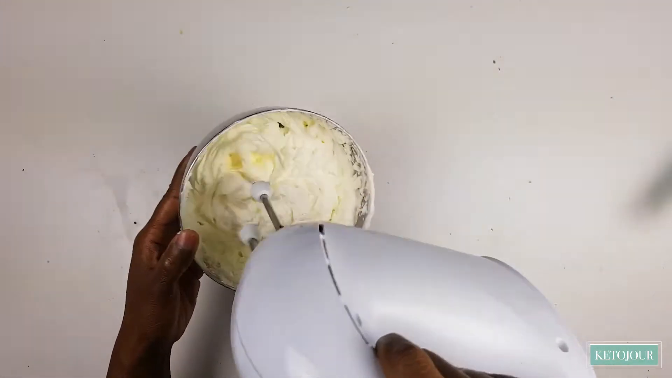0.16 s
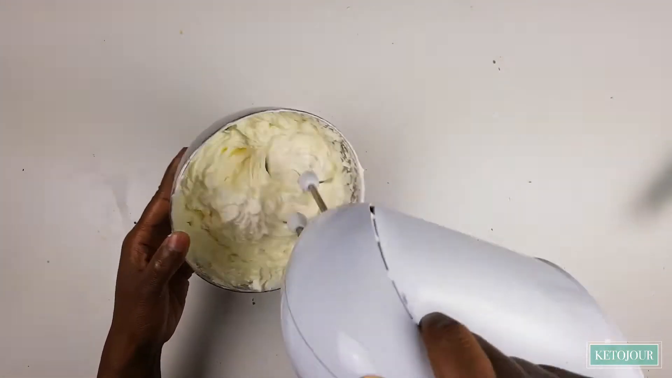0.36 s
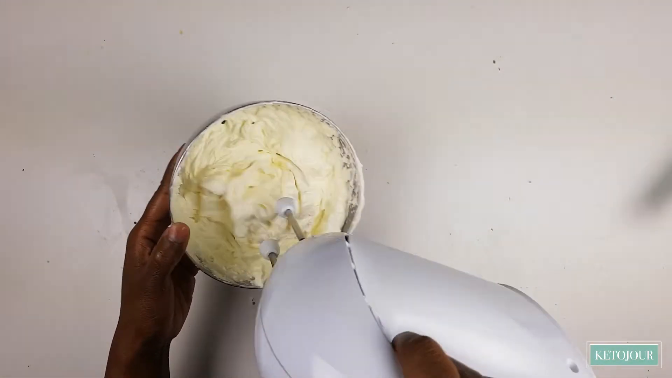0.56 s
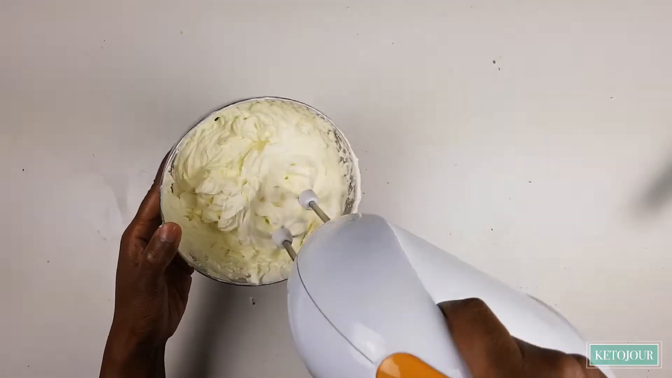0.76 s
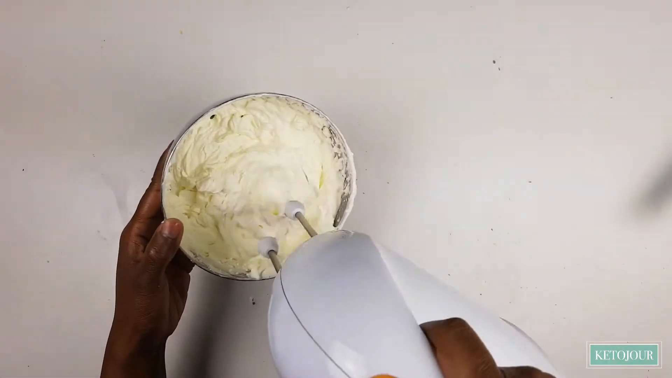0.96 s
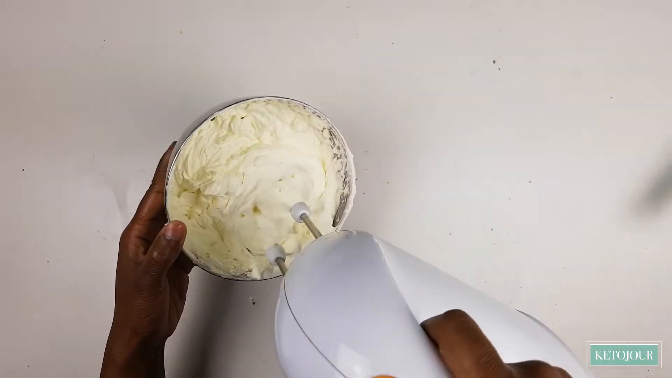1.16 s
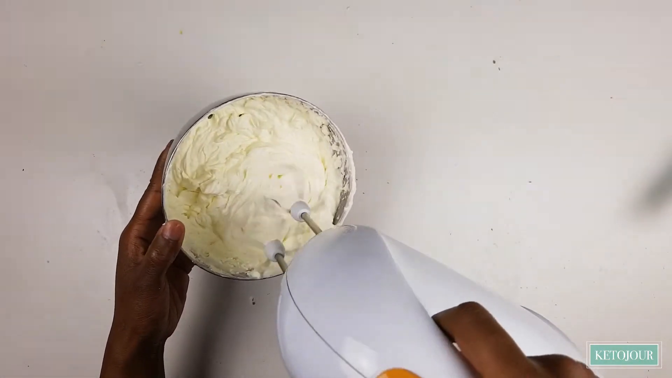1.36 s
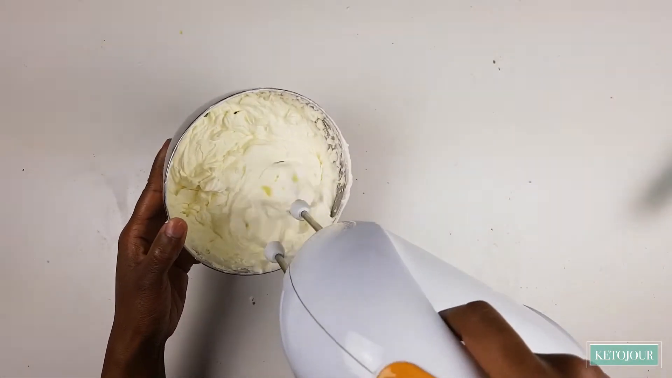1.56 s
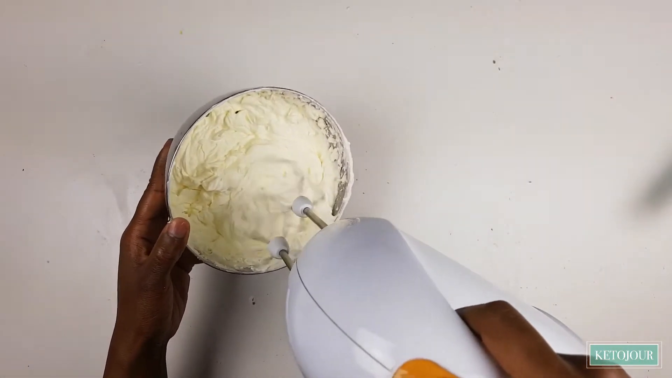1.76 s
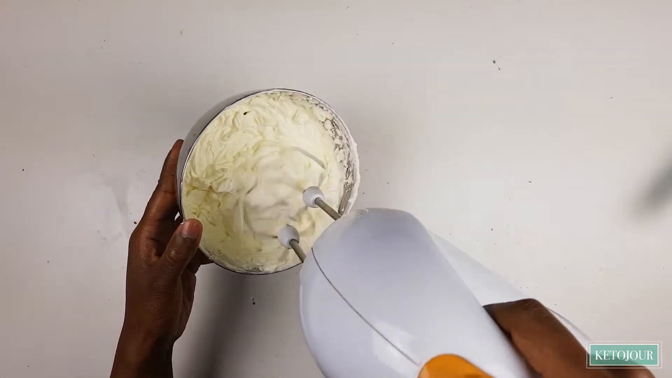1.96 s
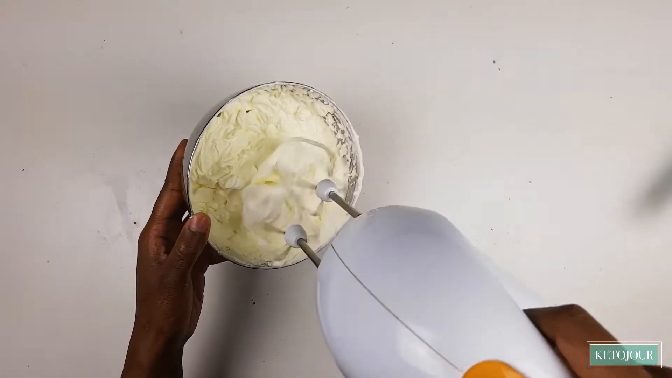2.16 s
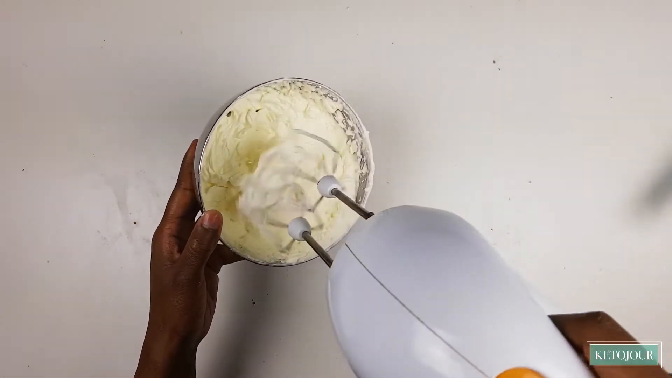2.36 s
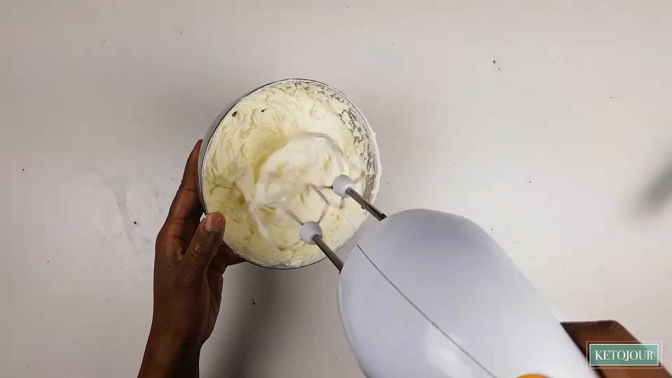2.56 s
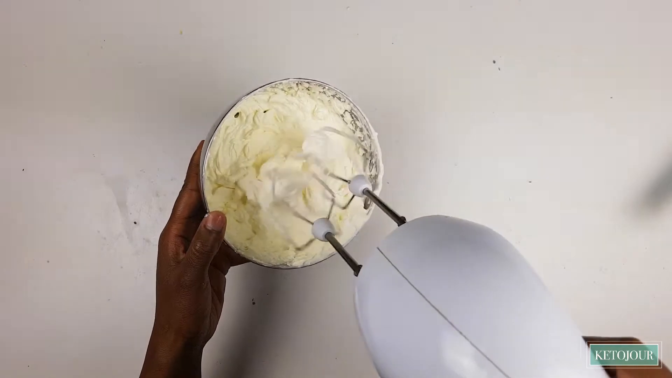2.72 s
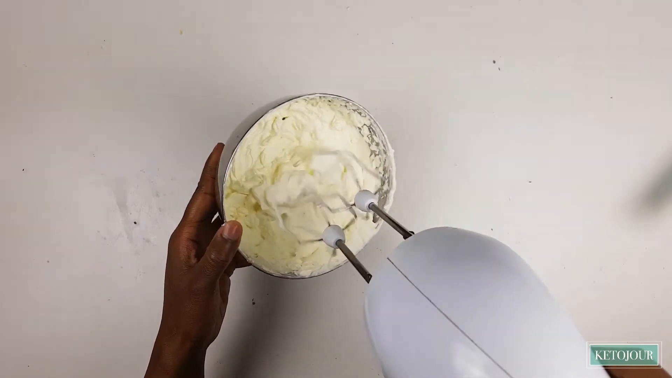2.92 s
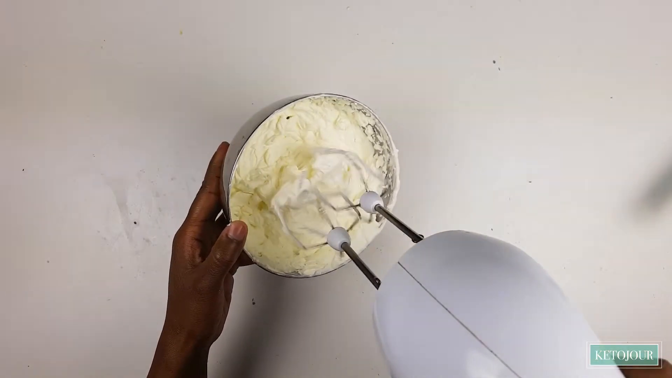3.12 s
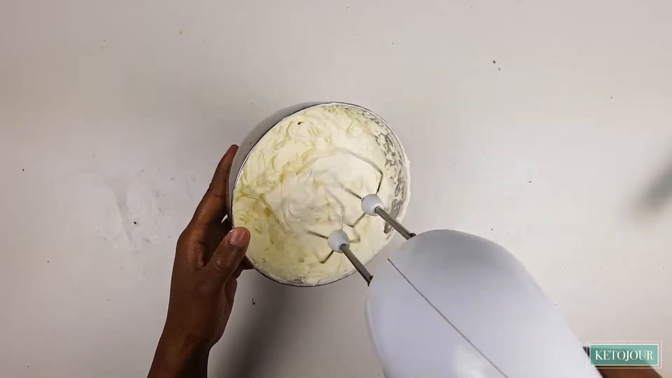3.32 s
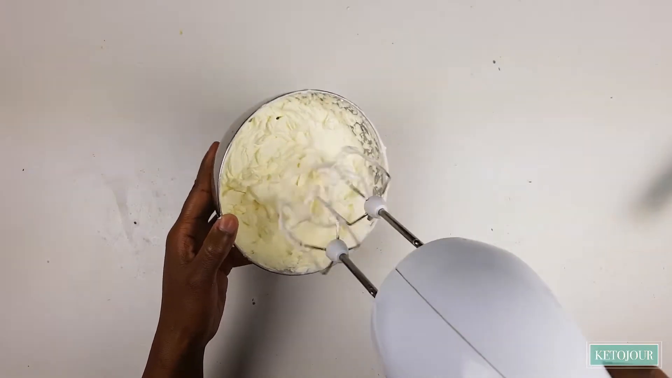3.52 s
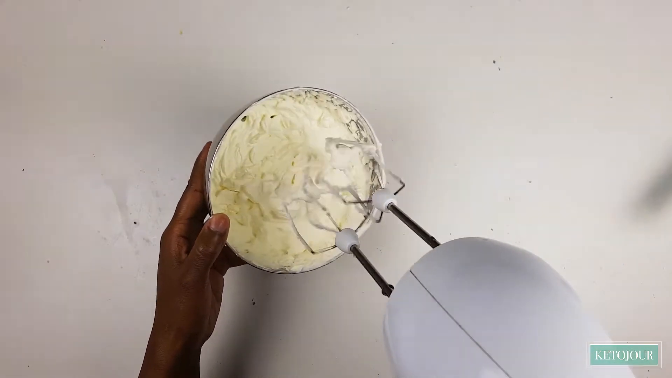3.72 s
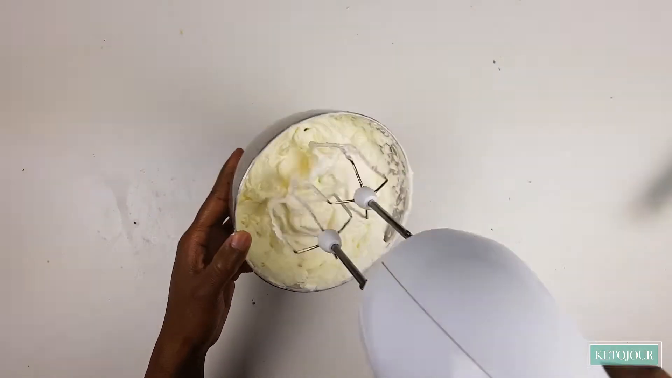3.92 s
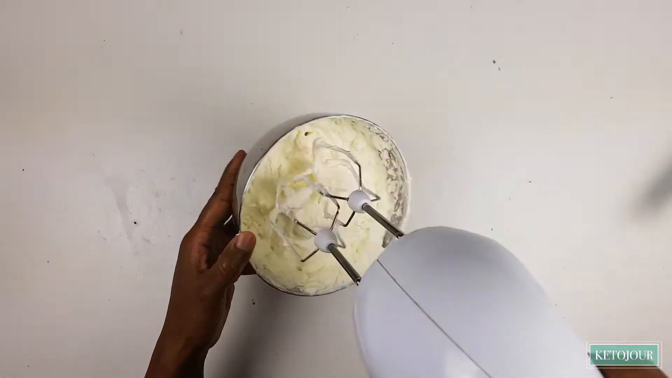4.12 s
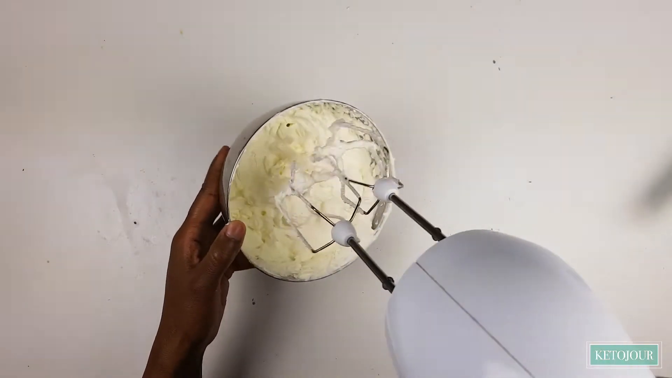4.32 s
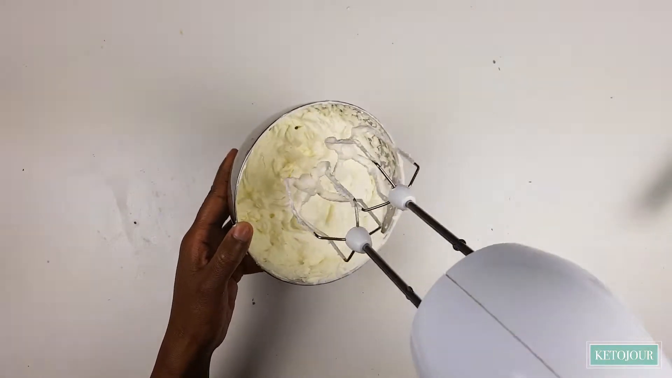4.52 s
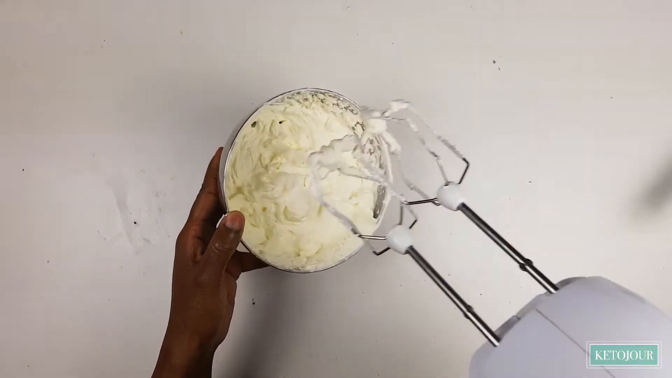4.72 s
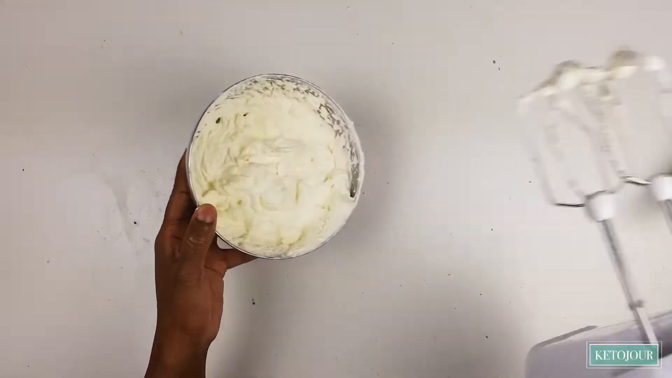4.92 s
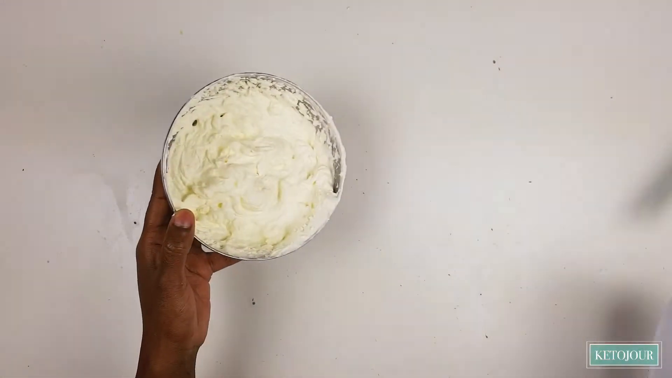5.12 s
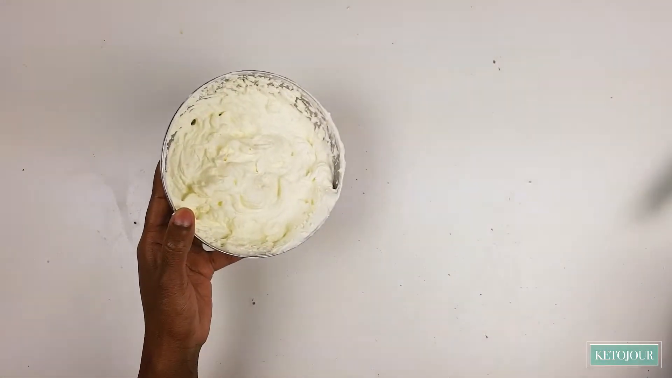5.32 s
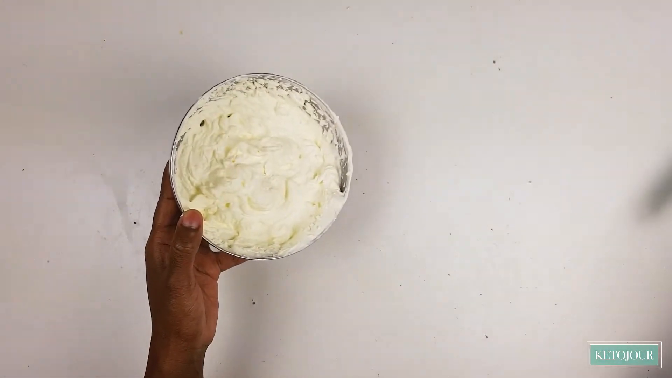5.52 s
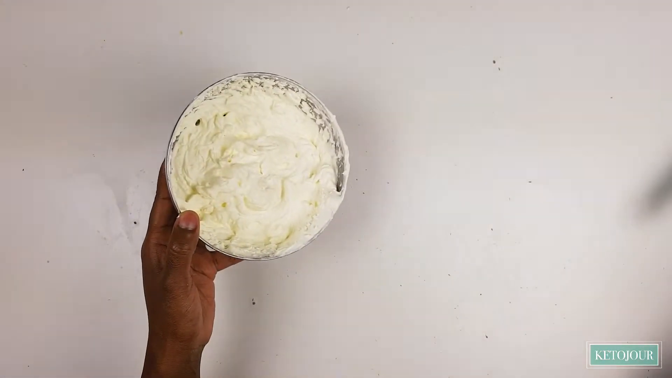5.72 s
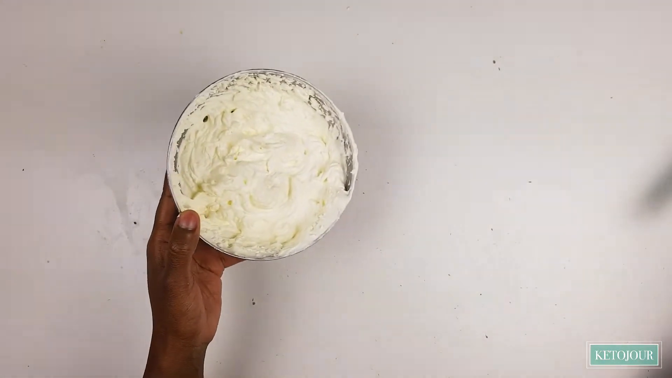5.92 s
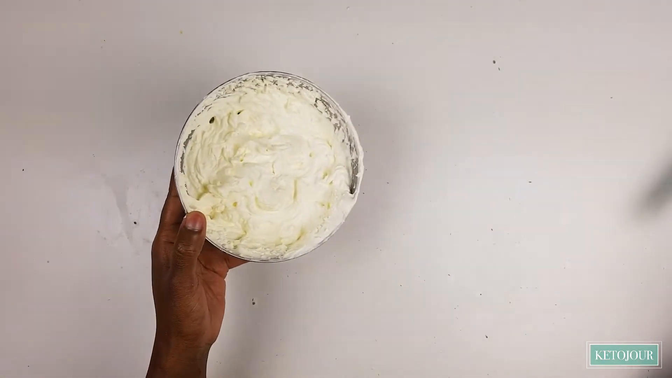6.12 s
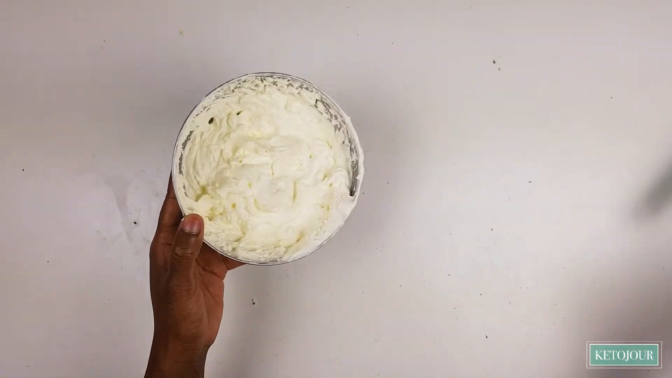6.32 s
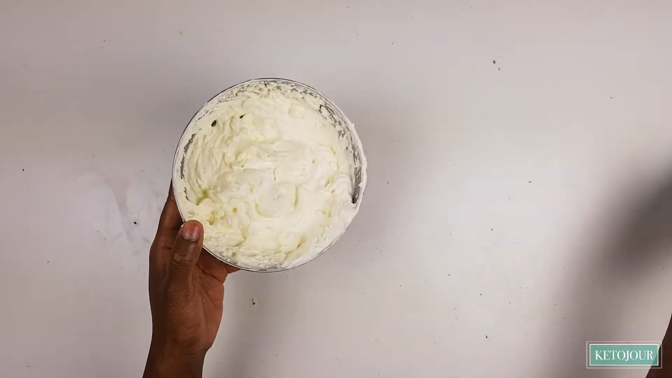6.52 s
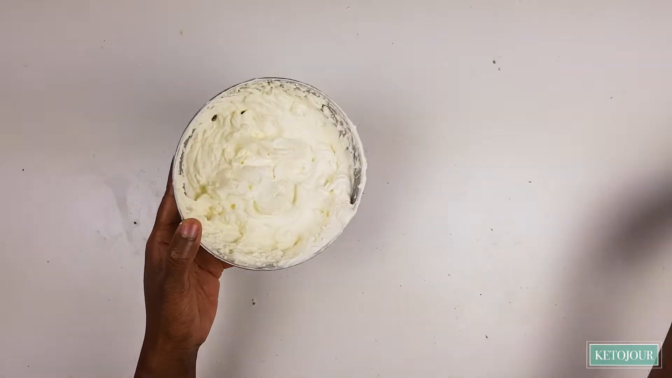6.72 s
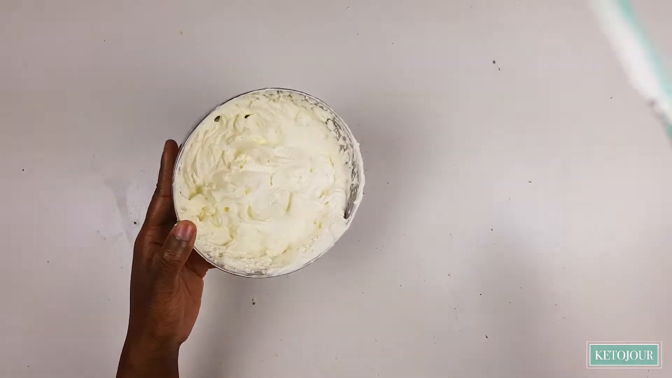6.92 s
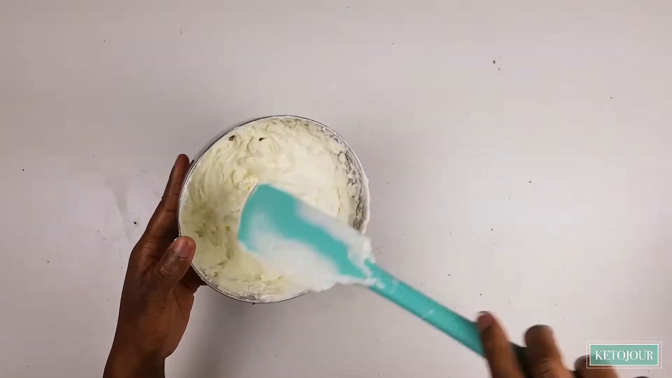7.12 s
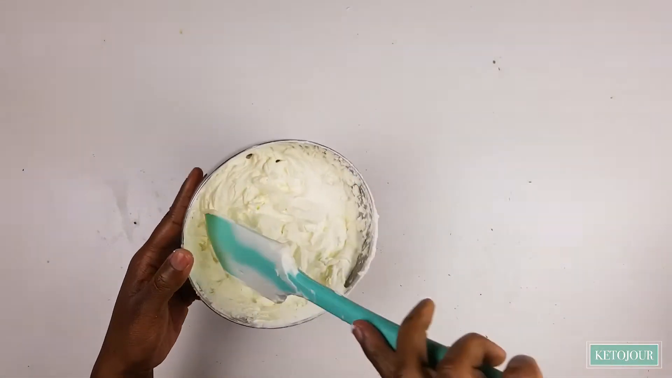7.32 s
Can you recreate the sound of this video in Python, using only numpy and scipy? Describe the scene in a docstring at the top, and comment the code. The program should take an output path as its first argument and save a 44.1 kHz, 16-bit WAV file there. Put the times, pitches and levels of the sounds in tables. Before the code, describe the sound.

A close stereo pickup in a quiet kitchen. From 0 to 1.2 seconds an electric hand mixer runs at speed, a bright whine with airy rush and brush hiss, sagging slightly as the beaters dig in. Wires slap a bowl of stiff cream about fifty times a second, an uneven rattle of dull thuds, hard clacks and metallic clinks. At 1.2 it is switched off; the last slaps scatter until about 1.6, and the whine glides down, softening steadily and fading out around 4 seconds. Faint shell ticks come near 3.3, then small creaks from 4.6 to 5.2. A soft cord slide brushes the table around 5.2 to 5.6. At about 5.85 the mixer lands with a solid low thump and click, rocks, and at 6.02 its heel knocks hollowly with a short metallic ring. Tiny ticks at 6.4 and 6.6, then faint room quiet.

```python
"""Wires slap a bowl of stiff cream some fifty times a second, under the whine of an electric hand mixer.
Slaps are clicks that ring the bowl; the motor is a set of rotor tones with rush, gear song and brush hiss.
It is switched off, the beaters leave the cream and the whine falls as the motor coasts down.
The shell creaks and ticks, the cord slides, and the mixer is stood on the table with a knock,
then tips onto its heel in a quiet kitchen, heard by two microphones."""
import sys
import numpy as np
from scipy import signal
from scipy.fft import rfft, irfft, next_fast_len
from scipy.io import wavfile

SR = 44100
rng = np.random.default_rng(int(sys.argv[2]) if len(sys.argv) > 2 else 0)


def materialize(psi):
    """Save the field psi as 16-bit PCM at rate SR to the path in sys.argv[1].

    A 1-D psi becomes a single channel; in a 2-D psi each row is a channel.
    """
    bounded = np.clip(np.atleast_2d(psi).T, -1, 1)
    quanta = np.round(bounded * 32767).astype(np.int16)
    wavfile.write(sys.argv[1], SR, quanta)


N = 329868
TIME = np.arange(N) / SR
OFF_S = 1.2  # the motor is switched off
FULL_SPEED_HZ = 270  # rotor turns per second at which the motor levels are stated

# how alike the two microphones hear the motor: [frequency_hz, likeness -1 to 1]
MOTOR_LIKENESS = [(60, .65), (250, .93), (500, .95), (1000, .7), (2000, .2), (5000, 0)]
# the same for sounds on and near the table: [frequency_hz, likeness -1 to 1]
TABLE_LIKENESS = [(150, .98), (300, .93), (600, .5), (2000, .45), (4000, 0)]
# the same for the cord and the room: [frequency_hz, likeness -1 to 1]
ROOM_LIKENESS = [(60, .55), (250, .4), (1000, .1), (2000, 0)]
# stereo balance of the motor and the handled shell: [frequency_hz, left_minus_right_db]
MOTOR_BALANCE = [(60, -3), (180, 0.5), (550, -2), (1650, -3), (4970, -4.5), (15000, 0)]


def from_db(db):
    """Decibels to an amplitude factor."""
    return 10 ** (np.asarray(db) / 20)


def rms_one(x):
    """Scale a sound to an RMS of one over all its channels."""
    return x / np.sqrt(np.mean(x ** 2) + 1e-20)


def in_time(rows):
    """Each column of a curve at every sample."""
    s, *columns = np.transpose(rows)
    return [np.interp(TIME, s, column) for column in columns]


def at_hz(points, hz):
    """A spectrum read on a log-frequency axis."""
    knots, values = np.transpose(points)
    return np.interp(np.log(np.maximum(hz, 1)), np.log(knots), values)


def colour(x, spectrum):
    """Causal (minimum-phase) filter with the given spectrum."""
    size = 8192
    gain = from_db(at_hz(spectrum, np.fft.rfftfreq(size, 1 / SR)))
    # folding the cepstrum forward in time gives minimum phase
    cepstrum = irfft(np.log(gain))
    cepstrum[1:size // 2] *= 2
    cepstrum[size // 2 + 1:] = 0
    kernel = irfft(np.exp(rfft(cepstrum)))[:size // 2]
    return signal.oaconvolve(x, kernel[None], axes=-1)[:, :x.shape[1]]


def resonate(x, modes):
    """Resonances ring on top of the sound that drives them."""
    out = x
    for hz, width_hz, db in modes:
        r = np.exp(-np.pi * width_hz / SR)
        poles = [1, -2 * r * np.cos(2 * np.pi * hz / SR), r * r]
        ring = signal.lfilter([1, 0, -1], poles, x + 1e-18)
        out = out + from_db(db) * (1 - r * r) / 2 * ring
    return out


def diffuse(size, likeness):
    """White noise at two microphones, as alike at each frequency as the table says."""
    hz = np.fft.rfftfreq(next_fast_len(size) * 2, 1 / SR)
    alike = np.clip(at_hz(likeness, hz), -1, 1)
    mid, side = rfft(rng.standard_normal((2, 2 * len(alike) - 2)))
    shared = np.sqrt((1 + alike) / 2) * mid
    opposed = np.sqrt((1 - alike) / 2) * side * [[1], [-1]]
    return irfft(shared + opposed)[:, :size]


def place(x, balance, lag_ms=0.0):
    """Share each frequency between left and right; the right microphone hears it lag_ms later."""
    left = colour(x[:1], [(hz, db / 2) for hz, db in balance])[0]
    right = colour(x[1:2], [(hz, -db / 2) for hz, db in balance])[0]
    size = next_fast_len(N + SR // 10)
    delay = np.exp(-2j * np.pi * np.fft.rfftfreq(size, 1 / SR) * lag_ms / 1000)
    return np.array([left, irfft(rfft(right, size) * delay, size)[:N]])


def kitchen(likeness, early_t60, early_db, late_t60, late_db):
    """Response of the space: direct sound, a quick scatter from table and bowl, the room's tail."""
    t = TIME[:SR // 2]
    out = np.zeros((2, len(t)))
    out[:, 0] = 1
    for t60, db in ((early_t60, early_db), (late_t60, late_db)):
        tail = diffuse(len(t), likeness) * from_db(-60 * t / t60) * np.minimum(t / 0.00075, 1)
        out += from_db(db) * rms_one(tail) / np.sqrt(len(t))
    return out


def blows(times, levels_db, response, low_hz, high_hz, scuff_s, scuff):
    """Each contact is a click and a short random scuff that set one range of a body's response ringing."""
    band = signal.butter(3, [low_hz, min(high_hz, .45 * SR)], "band", fs=SR, output="sos")
    response = signal.sosfilt(band, response)
    response = response / np.sqrt(np.mean(response[:, :SR // 100] ** 2))  # level of the first 10 ms
    t = TIME[:SR // 20]
    force = np.zeros(N + SR)
    for s, db in zip(times, levels_db):
        grains = rng.standard_normal(len(t)) ** 3 * np.exp(-t / scuff_s)
        contact = scuff * rms_one(grains) / np.sqrt(len(t))
        contact[0] += 1
        at = max(round(s * SR), 0)
        force[at:at + len(t)] += from_db(db) * contact / np.hypot(1, scuff)
    return signal.oaconvolve(force[None, :N], response, axes=-1)[:, :N]


def drift(rate):
    """Slow chance: normal random values, rate per second, joined by straight lines."""
    knots = rng.standard_normal(4096)
    return np.interp(TIME * rate, np.arange(len(knots)), knots)


def ringing(modes):
    """Free decay of a metal part, with its own phase at each of the two microphones."""
    t = TIME[:SR // 2]
    out = 0
    for hz, db, t60 in modes:
        phase = rng.normal(0, 0.82, (2, 1))
        out = out + from_db(db - 60 * t / t60) * np.sin(2 * np.pi * hz * t + phase)
    return out


def rotor_speed():
    """Turns per second: sagging as the beaters dig in, then braked by friction and fan drag to a stop."""
    # speed under power: [time_s, turns_per_s]
    running_curve = [(0, 283), (.4, 284), (.8, 270.7)]
    friction_hz_per_s, fan_loss_hz, fan_loss_s = 68.3, 39.4, .4
    grip_s, grip_hz_per_s = 3.15, 7  # at low speed the bearings grip harder
    running, = in_time(running_curve)
    coast_s = np.maximum(TIME - OFF_S, 0)
    friction = friction_hz_per_s * coast_s + grip_hz_per_s * np.maximum(TIME - grip_s, 0)
    fan_drag = fan_loss_hz * (1 - np.exp(-coast_s / fan_loss_s))
    return np.maximum(running - friction - fan_drag, .01)


def rotor_tones(speed, slowed, angle):
    """Multiples of the rotor speed glide through the housing's resonances; cream muffles the lower ones."""
    # tones of the rotor: [multiple_of_speed, level_db]
    orders = [(1, -1.5), (2, -11), (3, -14.5), (4, 3.5), (6, -16.5), (8, -16.5), (10, -5.5), (12, -17),
              (16, -18.5), (18, -17.5), (20, -16), (22, -19.5), (24, -11.5), (26, -16.5), (28, -17.5),
              (30, -15), (32, -14.5), (36, -13.5), (38, -17), (48, -15), (54, -17)]
    # how the housing radiates them: [frequency_hz, gain_db]
    housing = [(60, -38), (200, -16.5), (420, -21), (480, -12), (520, -1), (580, -7.5), (700, -10),
               (850, -3.5), (950, -11.5), (1020, 0), (1080, 1), (1140, -4.5), (1260, -13), (1700, -20),
               (1950, -17), (2120, -10.5), (2250, -15.5), (2420, -14.5), (2530, -9), (2680, -19),
               (2830, -17), (3000, -22), (3320, -20.5), (3700, -19), (4400, -13.5), (4700, -23.5),
               (5070, -20.5), (5600, -25), (7000, -23.5)]
    # how hard the cream loads the motor: [time_s, load 0-1]
    load_curve = [(0, .65), (.6, .65), (.85, 1), (1.15, 1), (1.3, .3), (1.4, 0)]
    waver_db = 1.6
    load, = in_time(load_curve)
    # slack gears: from 99 down to 89 turns per second their whine loses 7 dB
    slack = np.clip((99 - speed) / 10, 0, 1)
    # level at full speed, loss per tenfold drop of speed, loss under load (all dB)
    hum_level = -31.5 - 47 * slowed - 18.5 * load
    whine_level = -24 - 37.5 * slowed - 3 * load - 7 * slack
    commutator_level = -33 - 28 * slowed
    tones = 0
    for multiple, db in orders:
        order = round(multiple)
        level = hum_level if order <= 4 else whine_level if order <= 12 else commutator_level
        gain = from_db(level + db + at_hz(housing, order * speed) + waver_db * drift(25))
        # reflections shift the phase at each microphone, more for the short waves
        shift = np.minimum(order * speed / 2500, 1) * np.array([drift(4), drift(4)])
        tones = tones + np.sqrt(2) * gain * np.sin(order * angle + shift)
    return tones


def gear_rush(slowed, angle):
    """Gear and fan noise rings the shell, fluttering with the passing wires and fading with the speed."""
    # colour of the rush: [frequency_hz, level_db_per_hz]
    rush_colour = [(40, -41), (130, -15), (200, -12), (430, -12), (520, -3), (680, -3.5), (830, -2),
                   (950, -4.5), (1100, -5), (1400, -9.5), (1800, -12), (2500, -15), (3200, -19),
                   (6000, -33)]
    # air and shell resonances of the housing: [frequency_hz, width_hz, gain_db]
    shell_modes = [(525, 40, -0.5), (1068, 8.9, 11), (1123, 16, 4.5), (1210, 61, 4), (1487, 89, 0),
                   (1965, 52, 1.5), (2500, 120, 2), (3400, 81, 4), (4330, 45, 0.5), (5054, 120, 5.5)]
    # the worm gear turns the four-wired beaters once in 22 rotor turns
    wire_angle = 4 * angle / 22
    noise = diffuse(N, MOTOR_LIKENESS) * (1 + 0.098 * np.sin(wire_angle))
    rush = rms_one(resonate(colour(noise, rush_colour), shell_modes))
    return rush * from_db(-29 - 46 * slowed)


def gear_song():
    """The gear case sings on one narrow resonance, beating at random and fading after the switch."""
    # strength of the song: [time_s, level_db]
    song_curve = [(0, -41.5), (.6, -42), (.9, -47), (1.3, -48), (1.9, -59), (3.5, -80), (4.2, -110)]
    song_hz, wander_per_s = 2582, 45
    song_db, = in_time(song_curve)
    beating = np.array([drift(wander_per_s) + 1j * drift(wander_per_s) for _ in range(2)])
    beating = beating + beating.mean(axis=0)  # partly alike at the two microphones
    carrier = np.exp(2j * np.pi * song_hz * TIME)
    return from_db(song_db) * rms_one(np.real(beating * carrier))


def brush_hiss(slowed, angle):
    """Brushes rasp under current, pulsing twice a turn; a thin sizzle stays as the rotor coasts."""
    # colour of the rasp: [frequency_hz, level_db_per_hz]
    rasp_colour = [(1500, -18), (3000, 15.5), (5000, 4.5), (6200, 1.5), (8000, -10.5), (9800, -15),
                   (12000, 4), (14000, -10), (16000, -3)]
    # colour of the sizzle: [frequency_hz, level_db_per_hz]
    sizzle_colour = [(1500, 9.5), (3000, -5), (5000, 4), (6200, 2.5), (8000, 7.5), (10000, -9), (12000, 5),
                     (14000, 3.5), (16000, -1)]
    sparks = diffuse(N, MOTOR_LIKENESS) * (1 + .2 * np.sin(2 * angle))
    rasp_level = -36 - 39.5 * np.maximum(TIME - OFF_S, 0)
    rasp = from_db(rasp_level) * rms_one(colour(sparks, rasp_colour))
    sizzle = rms_one(colour(diffuse(N, MOTOR_LIKENESS), sizzle_colour))
    return rasp + from_db(-49 - 22 * slowed) * sizzle


def motor():
    """Tones, rush and brush pulsing follow one unevenly turning rotor; the gear song holds its own pitch."""
    jitter_hz = .4  # unevenness of the rotor speed
    gear_stall_hz = 58  # below this speed the rotor tones and the rush fade further
    speed = rotor_speed()
    slowed = np.log10(FULL_SPEED_HZ / speed)
    angle = 2 * np.pi * np.cumsum(speed + jitter_hz * drift(90)) / SR
    turning = np.minimum(speed / gear_stall_hz, 1) ** 1.5
    driven = turning * (rotor_tones(speed, slowed, angle) + gear_rush(slowed, angle))
    return place(driven + gear_song() + brush_hiss(slowed, angle), MOTOR_BALANCE, lag_ms=.15)


def slaps():
    """One uneven slap per passing wire; a hard strike replaces its neighbours. Gives s and four dB rows."""
    # wires meet the bowl sooner or later as the beaters are steered round it: [time_s, slaps_per_s]
    slap_rate = [(0, 66), (.046, 55), (.103, 45.6), (.288, 44.4), (.308, 59.8), (.404, 55), (.417, 44.7),
                 (.618, 47.8), (.715, 58.2), (.871, 51.4), (1.19, 53.2), (1.197, 46.2)]
    # force of the slaps before trims: [time_s, thud_db, clack_db, tick_db, snap_db]
    slap_force = [(0.0, -28.5, -30, -28, -29), (0.078, -28, -26.5, -37, -39),
                  (0.182, -18.5, -31, -30.5, -38.5), (0.29, -28.5, -25.5, -35.5, -32),
                  (.39, -30, -32, -36.5, -30.5), (0.435, -28, -37, -49.5, -46),
                  (0.52, -21.5, -25.5, -31, -35), (0.6, -21, -23, -23.5, -34.5),
                  (.69, -22, -31.5, -33, -40.5), (0.79, -17, -29.5, -33.5, -31.5),
                  (.95, -21, -29.5, -33.5, -34.5), (1.114, -24, -25.5, -29.5, -33.5),
                  (1.25, -24.5, -27, -33.5, -38.5), (1.43, -31.5, -35, -39.5, -43)]
    # a wire catches the bowl squarely, before trims: [time_s, thud_db, clack_db, tick_db, snap_db]
    hard = np.array([(0.1551, -21, -26.5, -29.5, -32), (0.177, -19.5, -32, -32, -34.5),
                     (0.198, -21.5, -31.5, -28, -36.5), (0.245, -21.5, -26.5, -32, -30.5),
                     (0.25, -31.5, -35.5, -30, -27), (.323, -22.5, -34, -33.5, -31),
                     (0.377, -27.5, -32.5, -32.5, -28.5), (0.392, -25.5, -30, -35, -29.5),
                     (.463, -22.5, -34, -40, -40.5), (0.5019, -23, -26.5, -30, -36),
                     (.523, -20.5, -27, -29, -34.5), (0.5454, -19, -27.5, -25.5, -34),
                     (.5655, -23.5, -32.5, -30.5, -29), (0.608, -28, -25.5, -21, -30.5),
                     (0.63, -23, -28, -29.5, -38), (0.6488, -20.5, -26.5, -29.5, -29.5),
                     (.689, -19.5, -26.5, -34.5, -42), (.83, -16.5, -28, -33, -33),
                     (.849, -19, -27, -30.5, -32), (0.866, -20.5, -28, -30.5, -33),
                     (.926, -19, -26, -33.5, -33), (0.9332, -21.5, -27.5, -33.5, -32),
                     (0.963, -20, -27, -24, -32.5), (1.004, -24.5, -28, -31, -36),
                     (1.011, -22, -28.5, -31.5, -32.5), (1.062, -19.5, -24, -24.5, -26),
                     (1.085, -19, -29.5, -27, -26.5), (1.1166, -26, -28, -24, -39),
                     (1.124, -31, -32.5, -39, -28), (1.1923, -21.5, -25.5, -23.5, -31),
                     (1.2152, -27.5, -25.5, -20, -28), (1.3, -26.5, -29.5, -29.5, -30),
                     (1.3851, -29, -29, -34, -31.5), (1.453, -24.5, -25.5, -25.5, -33.5),
                     (1.4783, -29, -27.5, -33.5, -34.5), (1.527, -38.5, -36, -33, -39.5),
                     (1.551, -35.5, -33.5, -35, -39.5)])
    lift_s = 1.6  # the beaters lift out of the cream
    # while pressed deepest, the second beater often hits just after the first
    deep_from_s, deep_to_s, second_share = 0.71, 1.3, .3
    second_lag_s, second_db = .008, -7.5
    rate, = in_time(slap_rate)
    s = TIME[1:][np.diff(np.floor(np.cumsum(rate) / SR)) > 0]
    chance = rng.random(len(s))
    # spread of each slap: time in s (cream makes it early or late), then thud, clack, tick, snap in dB
    scatter = rng.standard_normal((len(s), 5)) * [.0004, .8, 1, 3.5, 1.5]
    force = np.transpose(in_time(slap_force))[(s * SR).astype(int)]
    rows = np.column_stack([s, force]) + scatter
    gap_s = np.abs(s[:, None] - hard[:, 0]).min(axis=1)
    plain = (s < lift_s) & (gap_s > .005)
    doubled = (s > deep_from_s) & (s < deep_to_s) & (chance < second_share)
    seconds = rows[doubled] + [second_lag_s, second_db, second_db, second_db, second_db]
    return np.vstack([hard, rows[plain], seconds]).T


def beaters():
    """Wires thud and clack on the bowl, shafts tick and clink in their sockets, cream churns between."""
    # how alike the microphones hear the bowl: [frequency_hz, likeness -1 to 1]
    bowl_likeness = [(100, .95), (400, .97), (550, .9), (900, .55), (2000, .47), (4000, .25), (8000, .05),
                     (14000, -.05)]
    # the cream-filled bowl, broad shape: [frequency_hz, level_db_per_hz]
    bowl_colour = [(40, -45), (80, -19), (150, -4.5), (240, -7.5), (400, -4), (520, -7), (850, -5.5),
                   (1500, -7), (2200, -11), (2420, -11.5), (2700, -8.5), (3500, -11.5), (4300, -17.5),
                   (8000, -14), (9500, -19.5), (15500, -20)]
    # bowl and beater resonances: [frequency_hz, width_hz, gain_db]
    bowl_modes = [(330, 59, 10), (409, 51, 14.5), (742, 61, 2), (1070, 21, -5.5), (1733, 140, -3),
                  (2095, 86, 14), (2177, 52, 8.5), (2577, 55, 10.5), (2840, 65, 0), (3260, 140, 9),
                  (4160, 63, 1.5), (5000, 110, 5), (8175, 220, 5)]
    # the first beater's shaft ticks in its socket: [frequency_hz, width_hz, gain_db]
    socket_modes = [(3316, 130, 22.5), (3620, 200, 18)]
    # the second beater's shaft rings a little lower: [frequency_hz, width_hz, gain_db]
    clink_modes = [(2856, 130, 18.5), (3050, 140, 19.5)]
    # it jumps in its socket and clinks: [time_s, level_db]
    clinks = [(.11, -34.5), (.896, -33.5), (0.9336, -33), (.972, -28), (1.0112, -25), (1.05, -33),
              (1.1245, -35.5), (1.143, -29.5), (1.162, -34), (1.204, -32.5), (1.352, -32), (1.4157, -36),
              (1.4354, -34), (1.551, -29)]
    # stereo balance at the bowl: [frequency_hz, left_minus_right_db]
    bowl_balance = [(60, -3.5), (130, 1.5), (290, -3.5), (640, -5.5), (1410, -6.5), (3100, -7), (6820, -7),
                    (15000, 4.5)]
    thud_lag_s = .0012  # the bowl gives way a moment after the wire touches it

    open_space = kitchen(bowl_likeness, early_t60=0.039, early_db=-0.5, late_t60=0.11, late_db=1.0)
    dull_space = kitchen(bowl_likeness, early_t60=0.016, early_db=-14.0, late_t60=0.12, late_db=-13.5)
    bright_space = kitchen(bowl_likeness, early_t60=0.018, early_db=9.0, late_t60=0.071, late_db=7.5)
    shafts = kitchen(bowl_likeness, early_t60=0.026, early_db=-2.0, late_t60=0.15, late_db=-8.5)
    bowl = resonate(colour(open_space, bowl_colour), bowl_modes)
    damped = resonate(colour(dull_space, bowl_colour), bowl_modes)
    scattered = colour(bright_space, bowl_colour)
    socket, clinking = resonate(shafts, socket_modes), resonate(shafts, clink_modes)

    # cream churns round the beaters and dies away once the motor is off
    churn_level = -32.5 - 38 * np.maximum(TIME - OFF_S, 0)
    cream = diffuse(N, bowl_likeness) * from_db(2.3 * drift(300))
    churn = from_db(churn_level) * rms_one(resonate(colour(cream, bowl_colour), bowl_modes))

    s, thud_db, clack_db, tick_db, snap_db = slaps()
    clink_s, clink_db = np.transpose(clinks)
    thud = blows(s + thud_lag_s, thud_db - 1.13, damped, 75, 600, scuff_s=0.003, scuff=0.55)
    clack = blows(s, clack_db, bowl, 550, 2700, scuff_s=0.002, scuff=1.3)
    tick = blows(s, tick_db - 4.5, socket, 2500, 3900, scuff_s=0.0022, scuff=0.88)
    clink = blows(clink_s, clink_db, clinking, 1800, 3900, scuff_s=0.0017, scuff=0.47)
    snap = blows(s, snap_db - 1.0, scattered, 4000, 18000, scuff_s=0.0014, scuff=2.4)
    return place(thud + clack + tick + clink + snap + churn, bowl_balance)


def knocks():
    """The mixer is stood down: the table thumps, the shell clicks and rings hollow, beaters and frame ring on."""
    # it touches down, lands, rocks and settles; levels before trims:
    # [time_s, click_db, thump_db, body_db, hollow_db, steel_ring_db]
    landings = [(5.731, -53, -44, -53.5, -58, -37.5), (5.741, -60, -41, -66, -72, -55),
                (5.8548, -22, -18, -19.5, -26.5, -40.5), (5.8637, -40, -13.5, -33, -35, -41.5),
                (5.88, -30, -22, -27, -22, -48), (5.929, -32.5, -29, -30.5, -38, -49.5),
                (6.0182, -29.5, -64, -32, -26, -44), (6.026, -37, -39.5, -48, -44, -30)]
    # mixer body on the table, broad shape: [frequency_hz, level_db_per_hz]
    table_colour = [(25, -8.5), (65, -2), (130, 8), (240, -0.5), (450, -4), (700, -4.5), (1100, -5.5),
                    (1600, -8), (2800, -21), (4000, -33), (7500, -34), (11000, -35), (15500, -39)]
    # the table top's own modes: [frequency_hz, width_hz, gain_db]
    table_modes = [(125, 41, -24.5), (248, 76, 3), (336.5, 16, 6.5), (537, 38, 7.5), (614, 35, 1),
                   (767, 54, -1)]
    # the hollow housing rings when its heel meets the table: [frequency_hz, width_hz, gain_db]
    heel_modes = [(636, 35, 7), (770, 45, 27.5), (862, 50, 22.5), (1087, 50, 11), (1310, 100, 15)]
    # ring of the steel beaters: [frequency_hz, level_db, t60_s]
    steel_modes = [(3194, -1, 0.14), (7230, -11, 0.1)]
    # the motor frame rings on after the heel's blow: [frequency_hz, level_db, t60_s]
    frame_modes = [(1965, 0, 0.42), (2660, -8.5, 0.18)]
    # stereo balance at the table: [frequency_hz, left_minus_right_db]
    table_balance = [(60, 1), (150, -2.5), (380, -1), (950, -2.5), (2380, -3.5), (5980, -4.5), (15000, 1.5)]
    heel_s, frame_db = 6.0182, -52

    heavy_space = kitchen(TABLE_LIKENESS, early_t60=0.19, early_db=-1.5, late_t60=0.42, late_db=-7.5)
    light_space = kitchen(TABLE_LIKENESS, early_t60=0.0041, early_db=8.5, late_t60=0.19, late_db=16.0)
    heel_space = kitchen(TABLE_LIKENESS, early_t60=0.03, early_db=-5.0, late_t60=0.16, late_db=0.5)
    heavy = resonate(colour(heavy_space, table_colour), table_modes)
    light = resonate(colour(light_space, table_colour), table_modes)
    heel = resonate(heel_space, heel_modes)

    s, click_db, thump_db, body_db, hollow_db, ring_db = np.transpose(landings)
    thump = blows(s, thump_db - 1.5, heavy, 32, 540, scuff_s=0.0017, scuff=0.3)
    body = blows(s, body_db, light, 480, 2600, scuff_s=.003, scuff=0.17)
    hollow = blows(s, hollow_db - 4.0, heel, 600, 1700, scuff_s=0.0015, scuff=0.9)
    click = blows(s, click_db - 9.0, light, 2997, 18000, scuff_s=0.0014, scuff=0.38)
    steel = blows(s, ring_db - 22.0, ringing(steel_modes), 2700, 9000, scuff_s=0.001867, scuff=0.075)
    frame = blows([heel_s], [frame_db], ringing(frame_modes), 1500, 3100, scuff_s=0.0028, scuff=0.1)
    landing = place(thump + body + hollow + click + steel, table_balance, lag_ms=0.24)
    return landing + place(frame, table_balance)


def handling():
    """Creaks, small dry ticks and soft bumps, each ringing ranges of the hand-held plastic shell."""
    # the mixer creaks, ticks and bumps in the hand; levels before trims: # [time_s, thump_db, hollow_db,
    # body_db, clack_db, rattle_db, click_db]
    touches = [(3.251, -65, -59, -43.5, -69, -74, -63), (3.272, -74, -66, -51, -68, -65, -44.5),
               (3.3469, -58, -63, -57, -56, -71, -42), (4.606, -90, -50.5, -54.5, -72, -73, -74),
               (4.82, -71, -63, -55, -64, -67, -68), (4.958, -50, -46, -57, -63, -49.5, -42.5),
               (5.096, -56, -46, -54, -63, -61, -55), (5.185, -51, -61, -74, -76, -79, -70),
               (5.204, -42.5, -56, -70, -76, -79, -80), (5.385, -56, -62, -59, -58, -62, -56),
               (5.395, -66, -60, -57, -58.5, -76, -64), (6.399, -85, -84, -82, -78, -74, -57),
               (6.593, -50, -64, -78, -77, -78, -76)]
    # the hand-held shell, broad shape: [frequency_hz, level_db_per_hz]
    plastic_colour = [(40, -34), (100, 9), (150, 19), (200, 12), (330, 2.5), (550, -5.5), (850, 3),
                      (1600, -4.5), (3000, -8), (4400, -8), (6000, -19), (9000, -24), (15500, -29)]
    # resonances of the shell: [frequency_hz, width_hz, gain_db]
    plastic_modes = [(213, 11, -5), (530, 55, 10), (816, 95, 13), (3430, 550, 1)]
    space = kitchen(TABLE_LIKENESS, early_t60=.04, early_db=0.0, late_t60=.22, late_db=-3.0)
    shell = resonate(colour(space, plastic_colour), plastic_modes)
    s, thump_db, hollow_db, body_db, clack_db, rattle_db, click_db = np.transpose(touches)
    thump = blows(s, thump_db, shell, 60, 320, scuff_s=0.006, scuff=0.9)
    hollow = blows(s, hollow_db - 6.0, shell, 415, 710, scuff_s=0.0037, scuff=0.57)
    body = blows(s, body_db, shell, 540, 1090, scuff_s=0.0015, scuff=0.73)
    clack = blows(s, clack_db, shell, 1460, 2900, scuff_s=0.0035, scuff=3.3)
    rattle = blows(s, rattle_db, shell, 3000, 5600, scuff_s=0.015, scuff=0.81)
    click = blows(s, click_db - 11.5, shell, 4600, 17000, scuff_s=0.0014, scuff=1.0)
    return place(thump + hollow + body + clack + rattle + click, MOTOR_BALANCE, lag_ms=0.46)


def sliding_cord():
    """The cord slides over the table: coloured friction noise of uneven strength."""
    # strength of the slide: [time_s, level_db]
    slide = [(5.1, -100), (5.22, -64), (5.32, -60.5), (5.42, -61.5), (5.52, -71.5), (5.62, -100)]
    # colour of the friction: [frequency_hz, level_db_per_hz]
    cord_colour = [(100, 5), (500, 8.5), (1000, -5), (3000, -4.5), (5000, -10.5), (7000, -22.5),
                   (15000, -27.5)]
    slide_db, = in_time(slide)
    friction = rms_one(colour(diffuse(N, ROOM_LIKENESS), cord_colour))
    return from_db(slide_db + 2.5 * drift(50)) * friction


def quiet_room():
    """Steady, faint room noise, strongest in the bass."""
    # colour of the quiet: [frequency_hz, level_db_per_hz]
    quiet_colour = [(15, -41), (25, -9), (107, -5.5), (140, -4.5), (313, -12), (421, -13), (523, -14),
                    (598, -17.5), (703, -16.5), (919, -19.5), (1300, -17.5), (5880, -30.5), (15500, -33.5)]
    return from_db(-67) * rms_one(colour(diffuse(N, ROOM_LIKENESS), quiet_colour))


def scene():
    """Mixer, bowl, knocks, handling, sliding cord and the quiet room."""
    return motor() + beaters() + knocks() + handling() + sliding_cord() + quiet_room()


def record(dry):
    """The top is cut steeply above 15.7 kHz."""
    steep_cut = signal.ellip(10, .2, 80, 15700, fs=SR, output="sos")
    return signal.sosfilt(steep_cut, dry)


dry = scene()
out = record(dry)
materialize(out)
```